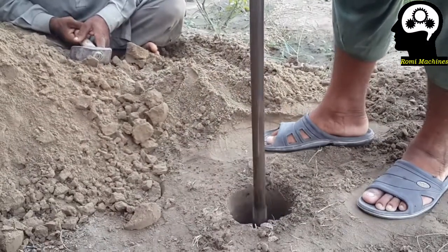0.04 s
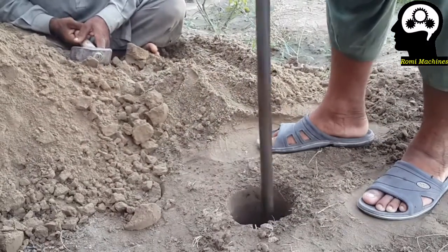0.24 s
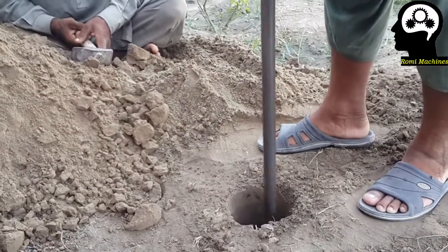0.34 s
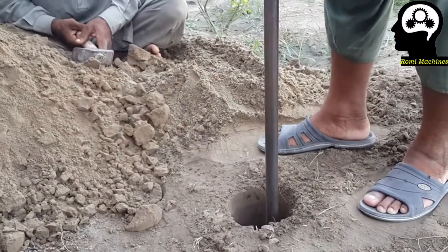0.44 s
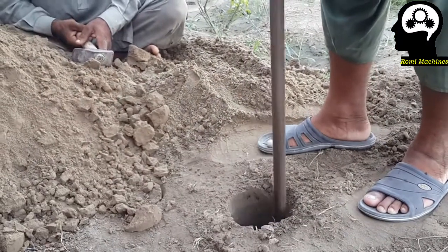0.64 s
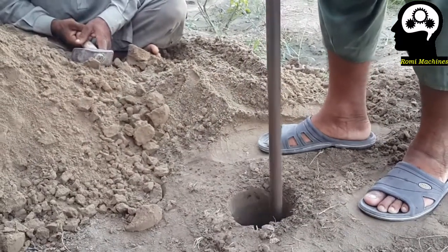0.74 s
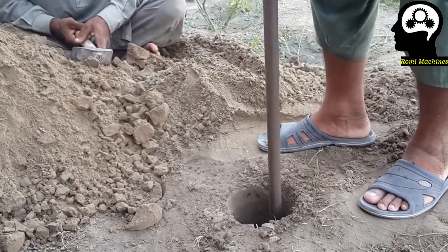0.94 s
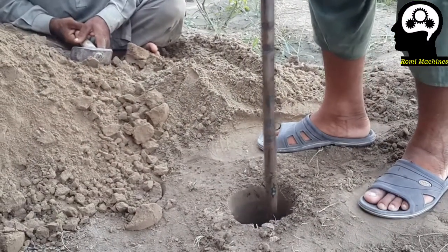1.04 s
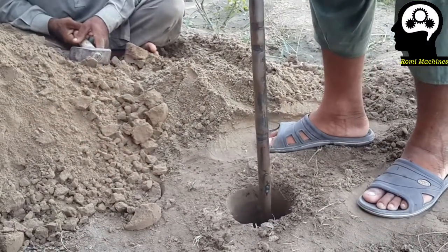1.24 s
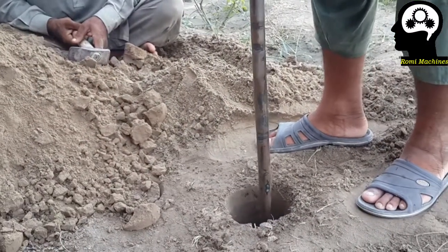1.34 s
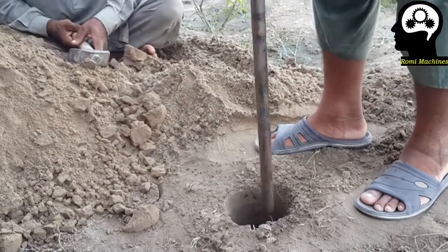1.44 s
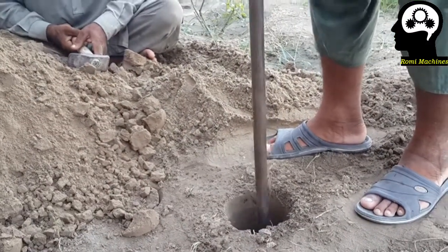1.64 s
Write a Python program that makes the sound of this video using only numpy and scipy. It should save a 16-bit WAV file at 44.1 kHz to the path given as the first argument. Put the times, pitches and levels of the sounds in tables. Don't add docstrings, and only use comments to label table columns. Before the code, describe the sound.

An iron pipe scrapes and thuds in a narrow dirt hole, clinks on stones and clanks

```python
import sys
import numpy as np
from scipy import signal
from scipy.fft import rfft, irfft, next_fast_len
from scipy.io import wavfile
from scipy.ndimage import uniform_filter1d, map_coordinates

SR = 44100
rng = np.random.default_rng(int(sys.argv[2]) if len(sys.argv) > 2 else 0)


def volts_from_decibels(level):
    exponent = np.asarray(level, float) / 20
    return 10 ** exponent


def persist_wave(psi):
    counts = np.round(np.clip(psi, -1, 1) * 32767).astype(np.int16)
    wavfile.write(sys.argv[1], SR, np.atleast_2d(counts).T)


N = 74970

# [f/Hz, level/dB]
AIR_SPECTRUM = [(200, -12), (620, -14), (1000, -16), (2000, -15), (4400, -19), (6500, -21), (9000, -18),
                (15500, -26)]
RUMBLE_SPECTRUM = [(18, -63), (30, -57), (52, -11), (96, -0.5), (228, -12.5), (261, -15), (310, -7),
                   (450, -51), (580, -63), (990, -120)]
# [t/s, sliding level/dB, wall rub over it/dB]
STROKES = [(0, -52, -9), (.07, -44.5, -6.5), (.118, -48.5, -1.5), (.15, -40, -9.5), (0.222, -33, -7.5),
           (.295, -38, 1.5), (.34, -31.5, -10), (.53, -32, -2), (0.599, -29.5, -8), (.75, -29, 3.5),
           (.81, -32, -7), (.89, -27.5, -15.5), (1.082, -33, -6.5), (1.119, -28, -4), (1.157, -38.5, 11),
           (1.21, -45, 0), (1.29, -70, 17),
           (1.57, -75.5, 26),
    (1.601, -46, -2),
    (1.7, -54, 13),
]
# [f/Hz, level/dB]
GRIT_SPECTRUM = [(1470, -22), (2500, -48), (2680, -8.5), (3570, -7), (3770, -9), (4440, -3), (6970, -3.5),
                 (8730, 2), (16000, -12)]
WALL_SPECTRUM = [(240, -36), (400, -25), (610, -3), (664, -8), (1050, -5.5), (1480, -7), (1850, 6.5),
                 (2340, 2), (5000, -2.5), (6500, -1.5), (11000, -120)]
# [t/s, level/dB, f/Hz, t60/s]
TICKS = [(0.22, -49.5, 916, 0.12), (.614, -26, 7850, 0.042), (.6893, -17.5, 1950, 0.041),
         (.6935, -8, 2020, 0.022), (1.16, -25.5, 9500, 0.037), (1.189, -34.5, 7940, 0.087),
         (1.189, -29.5, 9500, 0.028), (1.209, -38, 10100, 0.054), (1.209, -44, 13900, .02),
         (1.329, -49, 13500, 0.026), (1.356, -14, 2454, 0.018), (1.392, -19.5, 1526, 0.029),
         (1.596, -43, 2140, 0.045), (1.626, -43.5, 2170, 0.042), (1.681, -38, 3700, 0.031)]
# [t/s, push level/dB, f/Hz, t60/s, after-sound level/dB]
THUDS = [
    (0.6107, -4.5, 195, 0.031, -38.5),
    (.696, -5.5, 197, 0.02, -46.5),
    (1.127, -6, 515, 0.016, -47),
    (1.1332, 4, 132, 0.019, -32.5),
    (1.1501, -2, 141, 0.031, -39.5),
    (1.176, -20, 131, .04, -74),
    (1.208, -28, 260, 0.063, -60),
    (1.281, -29.5, 305, 0.059, -63),
    (1.306, -25, 250, .04, -57),
]
# [f/Hz, level/dB, t60/s]
BEND_MODES = [(108, 0, .3), (181, -7, .35), (254, -7, .8), (305, -10, .7), (360, -14, .6), (481, -13, .8),
              (622, -5, .9), (775, -14, .8), (865, -14, .7), (953, -12, .55), (1490, 0, .2), (1593, -3, .2),
              (2880, -4, .15), (5595, -15, .9)]
# [f/Hz, level/dB]
SOIL_SPECTRUM = [(35, -54), (60, -15.5), (210, -7.5), (254, -7.5), (446, -24), (610, -27), (1200, -24.5),
                 (1560, -22), (2640, -120)]
# [t/s, ringing level/dB, spray level/dB, spray t60/s, spray rise/s]
KNOCKS = [
    (.605, -53, -26, 0.19, 0.0029),
    (.611, -23, -24, 0.3, 0.0072),
    (1.124, -34, -24, 0.056, 0.0019),
]
# [f/Hz, level/dB, t60/s]
CLOD_MODES = [(920, -13, .2), (1050, -12, .25), (1310, -8, .12), (2200, -4, .08), (2730, -4, .4),
              (3500, -3, .06), (8020, -2, .2)]
# [f/Hz, level/dB]
CLOD_SPRAY = [(240, -44), (400, -24), (655, -16.5), (1040, -11), (1790, -12), (7280, -7.5), (8240, -17),
              (16000, -44)]
# [t/s, ringing level/dB, spray level/dB, spray t60/s, spray rise/s]
CLINKS = [
    (.6895, -23, -31, .3, .002),
    (.7105, -24, -34, .25, .002),
    (.736, -29, -46, .2, .002),
]
# [f/Hz, level/dB, t60/s]
STONE_MODES = [(1880, -6, .06), (1985, 0, .09), (2103, -1, .22), (2215, -4, .2), (2440, -16, .2),
               (2877, -8, .35), (3310, -14, .2), (3650, -8, .07), (4190, -4, .06)]
# [f/Hz, level/dB]
STONE_SPRAY = [(240, -54), (400, -24), (1290, -0.5), (1580, -10), (2050, -2), (2320, -10), (9180, -11),
               (16000, -38)]
# [t/s, length/s, level/dB]
DRAG = (0.76, 0.32, -49)
# [t/s, length/s, from f/Hz, to f/Hz, level/dB]
SQUEAK = (1.098, .032, 1750, 2600, -35)
# [t/s, ringing level/dB, spray level/dB, spray t60/s, spray rise/s]
CLANKS = [
    (1.3535, -60, -35, 0.028, 0.0026),
    (1.3558, -27, -16.5, 0.027, 0.0015),
    (1.358, -31.5, -19, 0.25, 0.0065),
    (1.377, -43, -35.5, 0.36, 0.002),
]
# [t/s, ringing level/dB, spray level/dB, spray t60/s, spray rise/s]
REBOUNDS = [
    (1.3885, -26, -27, 0.13, 0.0054),
    (1.3928, -20.5, -25, 0.47, 0.003),
]
# [f/Hz, level/dB, t60/s]
IRON_MODES = [(1300, -17, .1), (1482, -3, .35), (1597, -3, .08), (2040, -12, .3), (2336, -9, .3),
              (2598, -9, .3), (3040, 0, .24), (3180, 1, .3), (3332, 2, .3), (3644, -4, .24),
              (3793, -6, .16), (3950, -7, .16), (4100, -4, .14), (4495, -9, .15)]
COLLAR_MODES = [(2890, -4, .2), (4490, -4, .13), (5163, 2, .08), (5560, -23, .9), (5604, -18, .9),
                (6980, -8, .2), (7607, -3, .13), (7924, 4, .05), (8446, -5, .15), (9400, -1, .08),
                (9800, -2, .1), (10310, -2, .08)]
# [f/Hz, level/dB]
IRON_SPRAY = [(600, -45), (1000, -18), (1700, -5), (2900, -3), (4600, -11), (9500, -8), (14500, -17),
              (16500, -25)]
REBOUND_SPRAY = [(600, -23), (1000, -14), (1600, -2.5), (2200, -19), (3500, -8.5), (4800, -9), (9000, -9.5),
                 (13000, -48)]
# [t/s, level/dB, extra t60/s]
SHAKE = (1.385, -34, 1)
# [f/Hz, level/dB]
PORTS = [(60, 3.5), (380, 3.8), (700, .5), (1300, 1.5), (2400, -1.3), (4400, -.5), (6000, 5), (8200, 15),
         (15000, 19)]
# [f/Hz, correlation]
LIKENESS = [(60, 0.91), (180, 1), (550, 0.52), (1650, 0.39), (4970, 0.078), (15000, 0.0092)]

RING_RISE_S, PORT_PHASE_RAD, STRIKE_PHASE_RAD = .0012, .7, .5
BEND_ROUGH_DB, HIT_ROUGH_DB, SOIL_PATCHY_DB = 2, 2.2, 3


def unit(x):
    return x / np.sqrt(np.mean(x ** 2) + 1e-20)


def along(points, hz):
    f, v = np.transpose(points)
    return np.interp(np.log(hz + 1), np.log(f + 1), v)


def wobble(knots_per_s):
    knots = rng.standard_normal(int(N * knots_per_s / SR) + 4)
    return map_coordinates(knots, [np.arange(N) * knots_per_s / SR])


def filtered(x, response):
    m = next_fast_len(N + 8192)
    return irfft(rfft(x, m) * response(np.fft.rfftfreq(m, 1 / SR)), m)[..., :N]


def since(s):
    return np.clip(np.arange(N) / SR - s, 0, None)


def rush(spectrum, patchy_db, pair=None):
    if pair is None:
        pair = rng.standard_normal((2, N))
    z = signal.stft(pair, nperseg=256)[2]
    patches = uniform_filter1d(rng.standard_normal(z.shape[1:]), size=3, axis=0)
    patches = unit(uniform_filter1d(patches, size=16, axis=1))
    pair = signal.istft(z * volts_from_decibels(patchy_db * patches), nperseg=256)[1][:, :N]

    def mid_side(hz):
        turn = np.arccos(np.clip(along(LIKENESS, hz), -1, 1)) / 2
        return volts_from_decibels(along(spectrum, hz)) * [np.cos(turn), np.sin(turn)]

    mid, side = filtered(pair, mid_side)
    return unit(np.array([mid + side, mid - side]))


def modal(x):
    width_hz, uneven_db = 30, 2.2
    bumps = rng.standard_normal(int(SR / width_hz))
    return unit(filtered(x, lambda hz: volts_from_decibels(uneven_db * map_coordinates(bumps, [hz / width_hz]))))


def ring(modes, t, rise_s, port_phase_rad, rough_db):
    out = np.zeros((2, N))
    live = (t > 0) & (t < min(.7, max(m[2] for m in modes) + .05))
    t = t[live]
    for hz, db, t60 in modes:
        phase = port_phase_rad * rng.standard_normal((2, 1)) + STRIKE_PHASE_RAD * rng.standard_normal()
        unsettled = np.interp(t * 40, np.arange(30), rng.standard_normal(30))
        level_db = db + rng.standard_normal() + rough_db * unsettled - 60 * t / np.clip(t60, .02, .9)
        out[:, live] += volts_from_decibels(level_db) * np.sin(2 * np.pi * hz * t + phase) * (1 - np.exp(-t / rise_s))
    return out


def blows(events, modes, spectrum):
    pulse_s, pulse_depth = 0.0075, 0.064
    treble_hz, treble_t60_share = 10960, 0.56
    spray = modal(rush(spectrum, 3.4))
    top = filtered(spray, lambda hz: 1 / (1 + (treble_hz / (hz + 1)) ** 6))
    out = 0
    for s, ring_db, spray_db, t60, rise_s in events:
        t = since(s)
        pulsing = 1 + pulse_depth * np.cos(2 * np.pi * (t - .002) / pulse_s)
        crack = 1 + 2 * volts_from_decibels(-60 * t / .03)
        envelope = volts_from_decibels(spray_db - 60 * t / t60) * (1 - np.exp(-t / rise_s)) * pulsing * crack
        top_decay = volts_from_decibels(-60 * t / t60 * (1 / treble_t60_share - 1.5))
        out = out + volts_from_decibels(ring_db) * ring(modes, t, RING_RISE_S, PORT_PHASE_RAD, HIT_ROUGH_DB)
        out = out + envelope * (spray - top + top * top_decay)
    return out


def field():
    tone_hz, width_hz, tone_db, pulses_per_s = 5590, 60, -61, 22
    note = filtered(rng.standard_normal((2, N)), lambda hz: 1 / (1 + ((hz - tone_hz) / width_hz) ** 2))
    pulse_db = 0.96 * np.sin(2 * np.pi * pulses_per_s * np.arange(N) / SR)
    thin_tone = volts_from_decibels(tone_db + pulse_db) * unit(note)
    air = volts_from_decibels(-51.5) * rush(AIR_SPECTRUM, 2.6)
    rumble = volts_from_decibels(-50 + 1.5 * wobble(9.15)) * rush(RUMBLE_SPECTRUM + [(900, -51)], 2)
    return air + rumble + thin_tone


def sliding():
    grains_per_s, spread_db, grain_share = 9000, 2, .4
    s, level_db, wall_db = np.transpose(STROKES)
    t = np.arange(N) / SR
    level_db, wall_db = np.interp(t, s, level_db), np.interp(t, s, wall_db)
    hits = rng.random((2, N)) < grains_per_s / SR
    sizes = volts_from_decibels(spread_db * np.minimum(rng.exponential(size=N), 4))
    grains = hits * sizes * rng.standard_normal((2, N))
    crush = grain_share * unit(grains) + (1 - grain_share) * rng.standard_normal((2, N))
    grit_db = level_db + 3 + 0.27 * wobble(21.2) + 0.76 * wobble(62.1)
    grit = volts_from_decibels(grit_db) * modal(rush(GRIT_SPECTRUM, 1.8, crush))
    hum_db = level_db + wall_db - 1.5 + 0.21 * wobble(19.6)
    return grit + volts_from_decibels(hum_db) * modal(rush(WALL_SPECTRUM, 3))


def ticks():
    out = 0
    for s, db, hz, t60 in TICKS:
        cluster = [(hz * k, 0, t60) for k in (.97, 1, 1.025)]
        out = out + volts_from_decibels(db) * ring(cluster, since(s), 0.0023, PORT_PHASE_RAD, 0)
    return out


def knocks():
    return blows(KNOCKS, CLOD_MODES, CLOD_SPRAY)


def thuds():
    soil_db, soil_t60_s = 3.5, 0.33
    out, soil = 0, rush(SOIL_SPECTRUM, SOIL_PATCHY_DB)
    for s, db, hz, t60, after_db in THUDS:
        t = since(s)
        swing = np.sin(2 * np.pi * hz * (t + .0015 * (1 - np.exp(-t / 0.0017))))
        push = volts_from_decibels(db - 60 * t / t60) * (1 - np.exp(-t / 0.0053)) * swing
        crumble = volts_from_decibels(soil_db - 60 * t / soil_t60_s) * (1 - np.exp(-t / 0.0011)) * soil
        bend = ring(BEND_MODES, t, 0.00086, 1.0, BEND_ROUGH_DB)
        out = out + push + volts_from_decibels(after_db) * (bend + crumble)
    return out


def clinks():
    return blows(CLINKS, STONE_MODES, STONE_SPRAY)


def drag():
    s, length_s, db = DRAG
    swell = np.sin(np.pi * np.clip(since(s) / length_s, 0, 1))
    return volts_from_decibels(db) * swell * rush([(120, -40), (200, -2), (400, 0.5), (700, -46)], SOIL_PATCHY_DB)


def squeak():
    s, length_s, low_hz, high_hz, db = SQUEAK
    u = np.clip(since(s) / length_s, 0, 1)
    phase = 2 * np.pi * np.cumsum(low_hz + (high_hz - low_hz) * u ** 2) / SR
    return volts_from_decibels(db + 1.5 * wobble(150)) * np.sin(np.pi * u) * np.sin(phase + [[0], [1.2]])


def coupling():
    grip_s, grip_t60_s = 1.423, 0.39
    iron = blows(CLANKS, IRON_MODES, IRON_SPRAY) + blows(REBOUNDS, IRON_MODES, REBOUND_SPRAY)
    collar = ring(COLLAR_MODES, since(CLANKS[1][0]), RING_RISE_S, PORT_PHASE_RAD, HIT_ROUGH_DB)
    s, db, t60 = SHAKE
    t = since(s)
    shake = volts_from_decibels(db - 60 * t / t60) * ring(BEND_MODES[4:10], t, 0.017, 0.64, BEND_ROUGH_DB)
    return volts_from_decibels(-60 * since(grip_s) / grip_t60_s) * iron + volts_from_decibels(-21) * collar + shake


def scene():
    duck_s, duck_db, recovery_s = 1.352, -10, .06
    t = since(duck_s)
    duck = volts_from_decibels(duck_db * (t > 0) * np.exp(-t / recovery_s))
    hits = ticks() + knocks() + clinks() + coupling()
    return sliding() + drag() + squeak() + hits + duck * (field() + thuds())


def top_cut(x):
    return signal.sosfilt(signal.butter(12, 16620, fs=SR, output="sos"), x)


def record(dry):
    top_hz, left_leads_s = 15650, 4e-5

    def ports(hz):
        gain = 2 / (1 + volts_from_decibels(along(PORTS, hz) * np.array([[-1], [1]])))
        band = 1 / (1 + (hz / top_hz) ** 120)
        return gain * band * np.exp(1j * np.pi * hz * left_leads_s * np.array([[1], [-1]]))

    return top_cut(filtered(dry, ports))


dry = scene()
out = record(dry)
persist_wave(out)
```